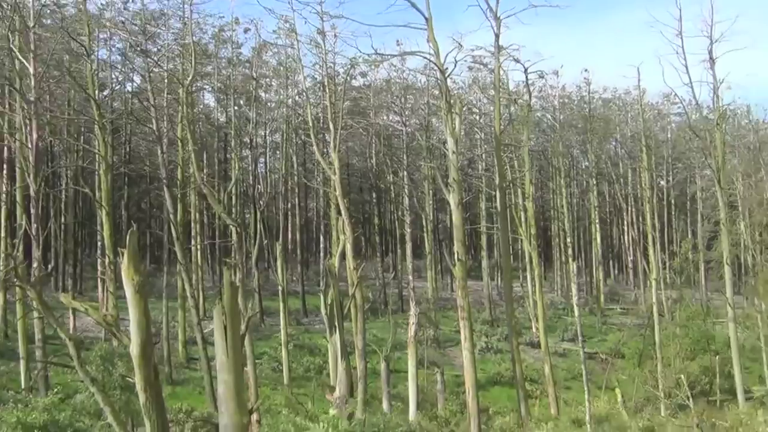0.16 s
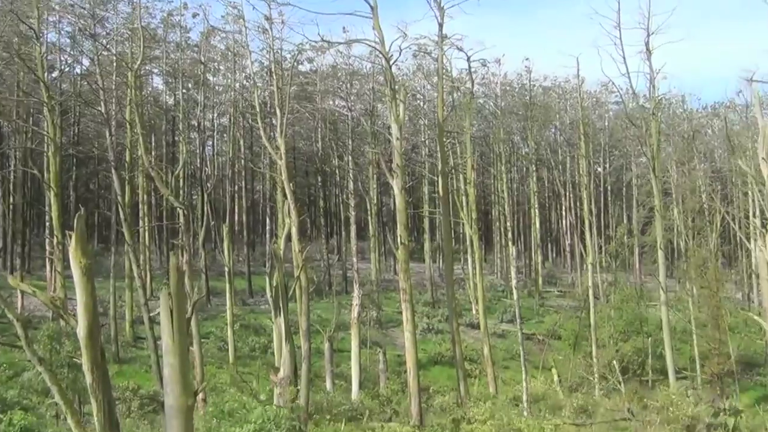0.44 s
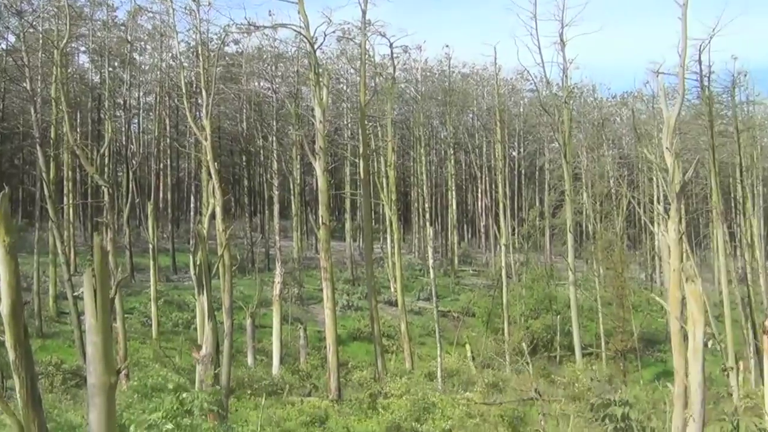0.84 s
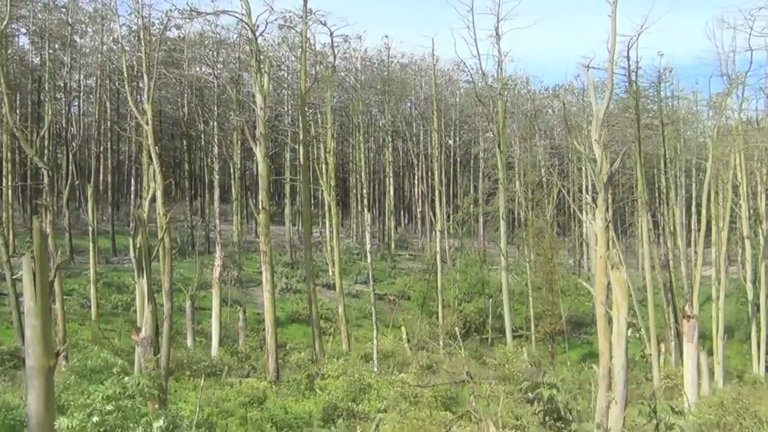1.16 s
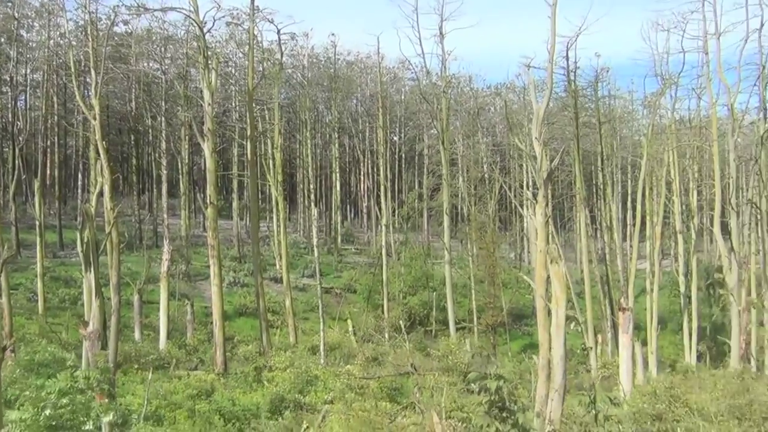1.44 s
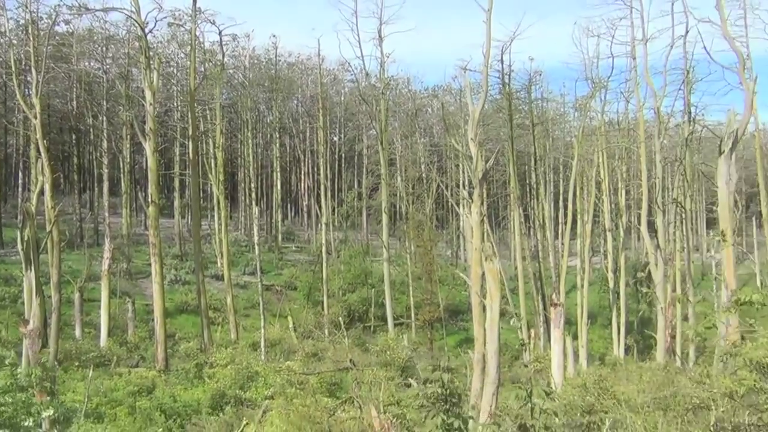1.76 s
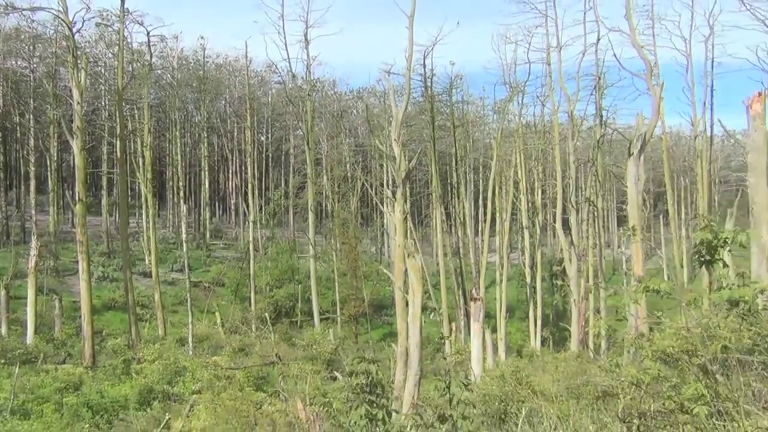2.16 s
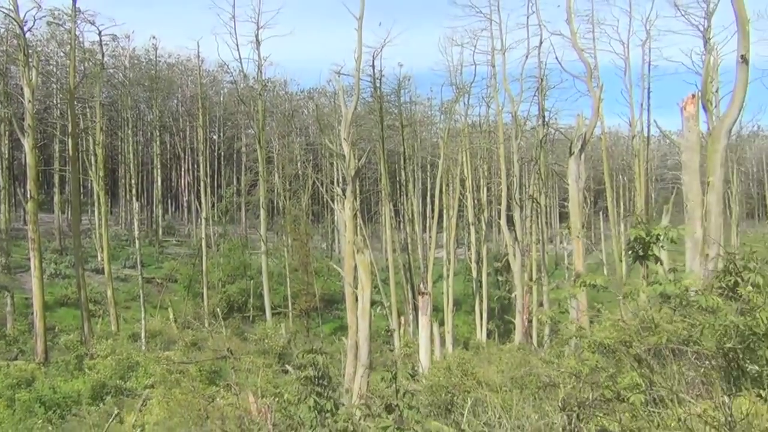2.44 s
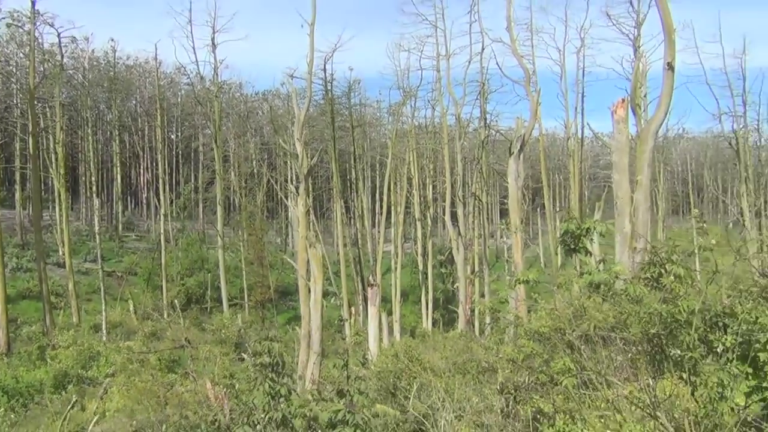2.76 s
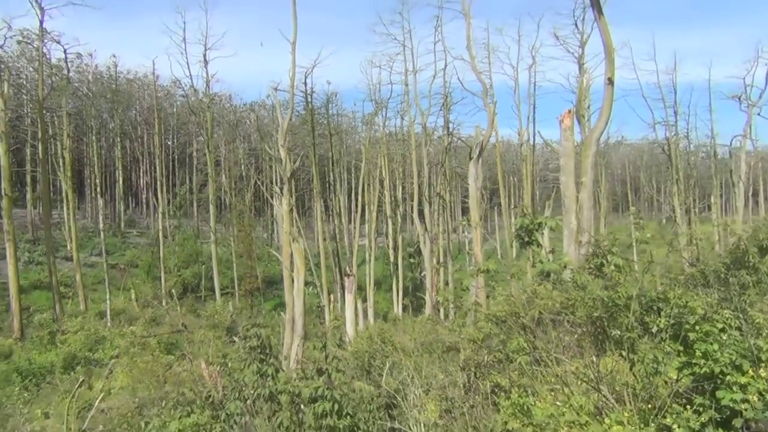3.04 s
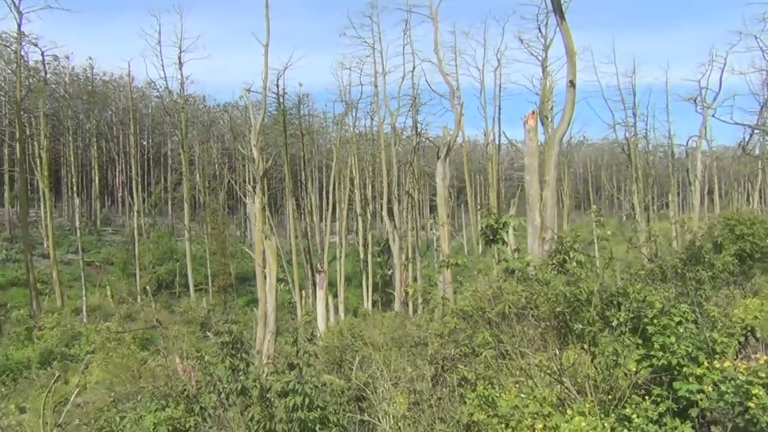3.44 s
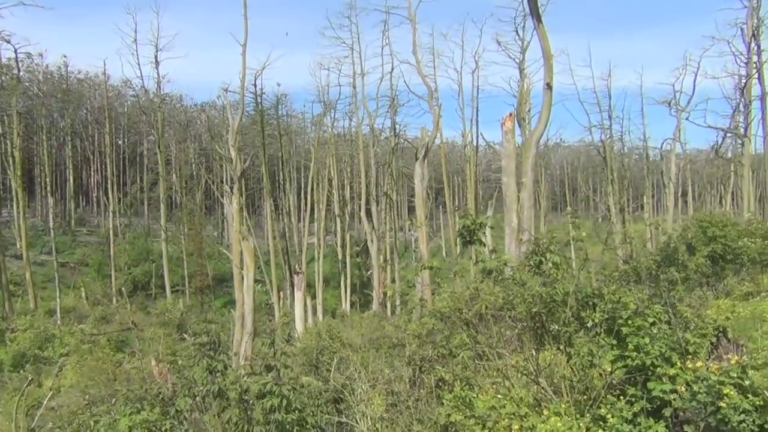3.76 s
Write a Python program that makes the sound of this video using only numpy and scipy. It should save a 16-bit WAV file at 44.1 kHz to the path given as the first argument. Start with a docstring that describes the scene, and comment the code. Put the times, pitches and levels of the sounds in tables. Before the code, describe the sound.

Steady overlapping whistled calls from a far bird colony, blurred by echo among trunks, with songbird chirps early, a thin long whistle near three seconds, then short trills; light low wind buffets on an outdoor stereo camera microphone.

```python
"""A distant bird colony in bare woodland: whistled calls blur into a wash around 2 kHz, a few nearer ones stand out.
The wash is shaped noise under a crowd of random gliding tones; the nearer calls are placed one by one.
Songbirds chirp, trill and hold one long whistle, all bending pure tones with an echo among the trunks.
Light wind puffs, as bursts of low noise, on the microphone of a slowly turning camera
that hisses (band-shaped noise) and whines faintly (a cluster of high sine tones)."""
import sys
import numpy as np
from scipy import signal
from scipy.fft import rfft, irfft, next_fast_len
from scipy.io import wavfile
from scipy.ndimage import uniform_filter1d, map_coordinates

SR = 44100
rng = np.random.default_rng(int(sys.argv[2]) if len(sys.argv) > 2 else 0)


def store_wav(level_fs):
    """Save 16-bit WAV to argv[1]."""
    pcm = np.round(np.clip(np.atleast_2d(level_fs), -1, 1) * 32767)
    wavfile.write(sys.argv[1], SR, pcm.T.astype(np.int16))


N = 171549

# Colour of the far colony and leaves: (frequency [Hz], relative density [dB per Hz])
WASH_SPECTRUM = [(180, -71), (300, -20.5), (498, -16.5), (850, -8.5), (1200, -3.5), (1370, -5.5),
                 (1940, -0.5), (2950, -9), (3770, -12), (4420, -19.5), (7870, -20.5), (9500, -34.5),
                 (12500, -44)]
# Loudness of the wash, also followed by the crowd: (time [s], level [dB])
WASH_LEVEL = [(0, -37), (.5, -39), (1.7, -38), (2.7, -39), (3.4, -38.5), (3.89, -38.5)]
# Swell of the wash's treble, used relative to its own mean: (time [s], level [dB])
TREBLE_SWELL = [(0, -49), (.045, -53.5), (.06, -46.5), (.085, -55), (.4, -60), (1.97, -62), (3.89, -63.5)]
# Stereo width of the wash: (frequency [Hz], left-right likeness [0-1])
WASH_ALIKE = [(300, 0.97), (640, 0.91), (1410, 0.99), (3100, 1), (5000, 0.9), (7500, 0.65), (10000, 1)]
# Stereo lean of the wash: (frequency [Hz], left over right [dB])
WASH_LEAN = [(200, -5), (700, -3.5), (1290, 0.5), (2380, 3), (4400, 0.4), (8120, 1.5)]
# Nearer colony whistles, level before flutter and echo:
# (time [s], length [s], first pitch [Hz], middle pitch [Hz], last pitch [Hz], level [dB])
WHISTLES = [(.28, .28, 1690, 1710, 1730, -45), (.53, .08, 1480, 1490, 1490, -43),
            (.52, .14, 2050, 2080, 2160, -46), (.16, .08, 1150, 1165, 1170, -47),
            (.86, .1, 2370, 2400, 2420, -48), (.62, .2, 1710, 1760, 1800, -48),
            (1.14, .14, 1680, 1675, 1690, -42), (1.28, .16, 1700, 1725, 1790, -43),
            (1.48, .1, 1790, 1760, 1730, -43), (1.7, .08, 2000, 2015, 2000, -45),
            (1.87, .25, 1740, 1765, 1765, -44.5), (2.12, .2, 1770, 1930, 2150, -47),
            (2.7, .19, 1860, 1900, 1990, -45), (2.94, .09, 1570, 1540, 1510, -43),
            (3.04, .09, 1860, 1875, 1885, -45), (3.41, .31, 2010, 1880, 1890, -43),
            (3.705, .065, 2110, 2160, 2220, -43), (3.785, .075, 2440, 2500, 2680, -45),
            (3.71, .08, 2440, 2460, 2470, -46), (3.0, .15, 3100, 3110, 3120, -51)]
# Songbird notes, level before flutter and echo:
# (time [s], length [s], first pitch [Hz], middle pitch [Hz], last pitch [Hz], level [dB])
CHIRPS = [(.338, 0.055, 4050, 4050, 4010, -53.5), (.408, 0.063, 7760, 6350, 4930, -48),
          (.585, 0.045, 7300, 6700, 5300, -45), (.622, .022, 5300, 5150, 5800, -47),
          (.596, .012, 4650, 4500, 4500, -49), (.635, 0.029, 3400, 3950, 4600, -47),
          (.798, 0.051, 7770, 6720, 5200, -44.5), (.85, 0.02, 5540, 5480, 5770, -47),
          (.795, 0.041, 5130, 4660, 3930, -51), (.852, 0.03, 3600, 3800, 4260, -45),
          (.872, .012, 4100, 3800, 3300, -54), (1.125, 0.056, 7600, 6540, 5130, -50.5),
          (1.122, .047, 5100, 4560, 3700, -54), (1.175, 0.03, 3500, 4070, 4000, -46),
          (1.315, 0.057, 7600, 7000, 5500, -52), (1.362, 0.02, 5400, 5320, 5330, -48),
          (1.305, 0.057, 5060, 4800, 3980, -55), (1.365, 0.029, 3650, 3850, 4540, -45.5),
          (1.392, 0.043, 4320, 3760, 3480, -45), (1.495, 0.02, 3900, 3850, 4030, -49),
          (1.53, 0.0236, 5600, 4670, 4450, -46.5), (1.647, 0.056, 5170, 4980, 4280, -49),
          (1.688, .031, 6470, 5650, 5000, -49), (1.727, .016, 5030, 5250, 5650, -47),
          (1.695, 0.059, 3980, 3710, 3420, -41), (1.746, 0.012, 4100, 4150, 4220, -37),
          (1.819, .038, 3790, 3200, 2800, -44.5), (1.854, 0.056, 4480, 4780, 3900, -50),
          (1.887, 0.041, 6650, 6000, 5000, -49), (1.921, .016, 5100, 5200, 5420, -49),
          (1.9, 0.024, 2550, 2760, 2980, -44), (1.926, 0.033, 3440, 3700, 4650, -45),
          (1.968, 0.024, 3400, 3480, 3560, -48), (2.1, 0.093, 8000, 7800, 8200, -56.5),
          (3.392, 0.035, 2800, 3010, 3250, -47), (3.533, 0.043, 3100, 2940, 3420, -42.5),
          (3.685, 0.05, 3340, 3010, 3440, -43), (3.682, .01, 3950, 3780, 3550, -44),
          (3.822, .012, 3970, 3750, 3450, -37), (3.835, 0.039, 3140, 3080, 3500, -42)]
# Trills of quick flicks, level before rounding, flutter and echo:
# (time [s], length [s], flick rate [1/s], centre pitch [Hz], upward sweep [Hz], level [dB])
TRILLS = [(1.604, .1, 62, 4100, 1000, -45), (3.348, .025, 93, 4000, 700, -46),
          (3.482, .066, 93, 3800, -500, -45), (3.638, .05, 90, 4020, -550, -43),
          (3.774, .05, 92, 4030, 450, -41.5)]
# First singer at the two ports: (frequency [Hz], left over right [dB], left leads by [rad])
OFF_AXIS = [(4300, -1, 0.094), (5200, 1, 1.07), (7500, 6.5, 1.6)]
# One long whistle, level before flutter and echoes: (time [s], pitch [Hz], level [dB])
LONG_WHISTLE = [(3.105, 4640, -70), (3.135, 4500, -58), (3.16, 4450, -44.5), (3.192, 4454, -41.5),
                (3.226, 4350, -43.5), (3.252, 4470, -45), (3.265, 4360, -68)]
# Wind puffs: (time [s], peak of the gain envelope [dB], bright over deep [dB])
PUFFS = [(0.015, -39, 5), (0.036, -40, -2), (.062, -43, -6), (0.13, -44, 10), (.151, -40, 10),
         (0.186, -44, 0), (.281, -44.5, 15), (0.361, -43, -14), (.39, -46, -4), (0.43, -39, 5),
         (.652, -43, 3), (.689, -40, -3), (0.749, -42.5, 26), (0.779, -46, 13), (.872, -52, 0),
         (1.232, -40.5, -6.5), (1.327, -49.5, -16), (1.507, -46, -3), (1.592, -54, -8), (1.708, -53, -11),
         (1.756, -43, -3), (1.809, -56, -4), (1.965, -48.5, 5), (2.085, -53, 6), (2.172, -39, 1),
         (2.198, -31.5, 2), (2.217, -32.5, 15), (2.305, -39.5, 7), (2.343, -44.5, 4), (2.54, -55.5, -8),
         (2.8, -52, 4), (3.075, -52, -13), (3.108, -39.5, -9), (3.359, -45, -8), (3.386, -49, -5),
         (3.865, -50, -13)]
# Stereo width of the wind: (frequency [Hz], left-right likeness [0-1])
WIND_ALIKE = [(25, .1), (60, .55), (130, 0.9), (300, .96)]
# Colours of the deep and the bright wind: (frequency [Hz], relative density [dB per Hz])
DEEP = [(25, -45), (60, -23), (110, -7.5), (200, 2), (300, -2), (500, -12), (1000, -70)]
BRIGHT = [(60, -30), (200, -8), (300, -4.5), (450, -1.5), (700, -6.5), (1200, -7.5), (2500, -46)]
# Breeze under the puffs, before its random lumps: (time [s], gain [dB])
BREEZE = [(0, -49), (.45, -51.5), (.55, -56.5), (.7, -54), (.95, -64.5), (2.5, -63), (3.3, -66.5),
          (3.89, -61.5)]
# Rumble, nearly unrelated in the two ports: (frequency [Hz], relative density [dB per Hz])
RUMBLE = [(15, -20), (30, -16), (60, -1), (110, 7), (200, -9), (400, -60)]
# Colour of the recorder's hiss: (frequency [Hz], relative density [dB per Hz])
HISS = [(5290, -21), (9000, -1), (11000, -2), (15100, -4), (15800, -4)]
# Tones of the electrical whine: (frequency [Hz], level [dB])
WHINE = [(15574, -86), (15628, -83), (15676, -87)]

TREBLE_HZ = 4900  # where the wash's treble begins
CROWD_DB, CROWD_HZ, CROWD_S = -7.5, 1943.5, 0.1101  # level over the wash, median pitch, median length
CROWD_SPREAD, CROWD_SCATTER_DB = .18, 3.5  # random spread of log pitch and of level
CROWD_RISE, CROWD_GLIDE = .025, .025  # common and random pitch bend, shares of the pitch
EDGE, WAVER = .22, .004  # share of a note that fades at each end; unsteadiness as a share of pitch
FLUTTER_DB = 2.4  # random flutter of note level
FLICK = .95  # length of a flick over its period
WHISTLE_LEAN_DB, FAR_SINGER_LEAN_DB = 4, 4  # left over right
CHANGE_S = 2.6  # a second singer takes over
WOOD_S = 0.53  # echo among trunks: time to fall 60 dB
CROWD_WET_DB, NEAR_WET_DB, SONG_WET_DB = -4.5, -8, -7  # that echo, for crowd, nearer whistles and songbirds
SLAP_S, SLAP_DB, SLAP_STEP_DB = .122, -14, 0.5  # wood's-edge echo: delay, level, rise on the second return
PUFF_S = 0.0062  # Gaussian half width (sigma)
BREEZE_LUMPS_DB, BREEZE_BRIGHT_DB = 3.5, -4  # random lumps; bright part against deep part
RUMBLE_DB, WIND_LEAN_DB = -70, -1.7  # rumble level; wind's left over right
HISS_DB = -63.5
WHINE_DRIFT = 1.8  # scale of the slow phase wander, radians
TURN_DB_PER_S = 0.18  # the scene drifts left as the camera turns
TOP_HZ = 15790  # the camera's band limit


def colony():
    """The whole colony: far wash, overlapping crowd and nearer whistles echoing among the trunks."""
    level = amp(curve(WASH_LEVEL))
    near = wood(sung(WHISTLES), WHISTLE_LEAN_DB, NEAR_WET_DB)
    return far_wash(level) + crowd(level) + near


def far_wash(level):
    """Voices and leaves too far to tell apart: shaped noise whose treble swells on its own."""
    wash = rush([(100, -120)] + WASH_SPECTRUM, WASH_ALIKE, patchy_db=1.43)
    treble = filtered(wash, lambda hz: 1 / (1 + (TREBLE_HZ / (hz + 1)) ** 8))
    body = wash - treble
    swell = curve(TREBLE_SWELL)
    treble_gain = level.mean() * amp(swell - swell.mean())
    return filtered(level * body + treble_gain * treble, lambda hz: sides(along(WASH_LEAN, hz)))


def crowd(level, count=360):
    """Random whistles, scattered in pitch, length, bend and level, overlapping in the echoing wood."""
    when = rng.uniform(0, N / SR, count)
    pitch, length, bend, arch, loudness = rng.standard_normal((count, 5)).T
    hz = CROWD_HZ * np.exp(CROWD_SPREAD * pitch)
    rise = CROWD_RISE + CROWD_GLIDE * bend
    middle = hz * (1 + CROWD_GLIDE * arch / 2)
    calls = zip(when, CROWD_S * np.exp(length / 4), hz * (1 - rise), middle, hz * (1 + rise),
                CROWD_SCATTER_DB * loudness)
    return level * amp(CROWD_DB) * unit(wood(sung(calls), WHISTLE_LEAN_DB, CROWD_WET_DB))


def songbirds():
    """Two singers in turn; the first reaches the ports off axis, with level and phase differences."""
    notes = sung(CHIRPS + flicks())
    late = np.arange(N) > CHANGE_S * SR
    f, lean_db, lead = np.transpose(OFF_AXIS)

    def ports(hz):
        phase = .5j * np.outer([1, -1], np.interp(hz, f, lead))
        return sides(np.interp(hz, f, lean_db)) * np.exp(phase)

    first = filtered(wood(notes * ~late, 0, SONG_WET_DB), ports)
    second = wood(notes * late + long_whistle(), FAR_SINGER_LEAN_DB, SONG_WET_DB)
    return first + second


def flicks():
    """Each trill as a row of short gliding notes, loudest in the middle of the row."""
    notes = []
    for s, length, rate, hz, sweep, db in TRILLS:
        for k in range(int(length * rate)):
            arch = np.sin(np.pi * (k + 1) / (length * rate + 1))
            notes.append((s + k / rate, FLICK / rate, hz - sweep / 2, hz, hz + sweep / 2,
                          db + 4 * np.log(arch + 0.0011)))
    return notes


def long_whistle():
    """A held, dipping sine whistle that comes back twice off the wood's edge."""
    s, hz, db = np.transpose(LONG_WHISTLE)
    t = np.arange(N) / SR
    phase = 2 * np.pi * np.cumsum(np.interp(t, s, hz)) / SR
    tone = amp(np.interp(t, s, db, -120, -120)) * 2 ** .5 * np.sin(phase)
    back = sum(amp(SLAP_DB + SLAP_STEP_DB * k) * np.roll(tone, round(SLAP_S * (k + 1) * SR))
               for k in range(2))
    return (tone + back) * amp(FLUTTER_DB / 2 * wobble(60))


def sung(notes):
    """Pure notes whose pitch bends through three values, with unsteady level and pitch."""
    out = np.zeros(N + 2 * SR)
    flutter = amp(FLUTTER_DB * wobble(130))
    waver = 1 + WAVER * wobble(80)
    for s, length, first, mid, last, db in notes:
        i = round(s * SR)
        u = np.linspace(0, 1, max(round(length * SR), 2))
        # parabola through the first, middle and last pitch
        hz = first * (1 - u) * (1 - 2 * u) + 4 * mid * u * (1 - u) + last * u * (2 * u - 1)
        hz = hz * np.resize(waver[i:], len(u))
        tone = np.sin(2 * np.pi * np.cumsum(hz) / SR)
        out[i:i + len(u)] += amp(db) * 2 ** .5 * fade(u) * tone
    return out[:N] * flutter


def fade(u):
    """Soft rise, hold and fall over u from 0 to 1."""
    return np.sin(np.pi / 2 * np.clip(np.minimum(u, 1 - u) / EDGE, 0, 1)) ** 2


def wood(x, lean_db, wet_db):
    """The direct sound and its scattered echo among trunks: decaying noise, partly shared by both sides."""
    t = np.arange(SR // 2) / SR
    noise = rng.standard_normal((3, len(t))) * amp(-60 * t / WOOD_S)
    shared = noise[0]
    tail = (shared + 0.39 * noise[1:]) / np.linalg.norm(shared)
    echo = signal.fftconvolve(x[None], tail, axes=1)[:, :N]
    return sides(lean_db)[:, None] * (x + amp(wet_db) * echo)


def wind():
    """Turbulence on the microphone: lumpy low breeze, short deep or bright puffs, and a rumble."""
    t = np.arange(N) / SR
    s, db, bright_db = np.transpose(PUFFS)
    shape = np.exp(-((t - s[:, None]) / PUFF_S) ** 2 / 2)
    deep_share = 1 / (1 + amp(2 * bright_db))  # shares of each puff's power
    bright_share = 1 / (1 + amp(-2 * bright_db))
    breeze = amp(curve(BREEZE) + BREEZE_LUMPS_DB * wobble(17))
    deep_gain = (amp(db) * np.sqrt(deep_share)) @ shape + breeze
    bright_gain = (amp(db) * np.sqrt(bright_share)) @ shape + amp(BREEZE_BRIGHT_DB) * breeze
    deep = deep_gain * even(rush(DEEP, WIND_ALIKE, patchy_db=-1.5))
    bright = bright_gain * even(rush(BRIGHT, WIND_ALIKE, patchy_db=1.0))
    rumble = amp(RUMBLE_DB) * rush(RUMBLE, [(50, -0.16)], patchy_db=-2.5)
    return sides(WIND_LEAN_DB)[:, None] * (deep + bright) + rumble


def hiss():
    """The recorder's own steady high noise, nearly the same on both sides."""
    return amp(HISS_DB) * rush([(5000, -40)] + HISS, [(9000, .97), (13000, .989)], patchy_db=.6)


def whine():
    """A faint electrical tone with side tones, all sharing one slow phase wander."""
    t = np.arange(N) / SR
    drift = WHINE_DRIFT * wobble(8)
    return sum(amp(db) * 2 ** .5 * np.sin(2 * np.pi * hz * t + drift) for hz, db in WHINE)


def rush(spectrum, alike, patchy_db):
    """Stereo noise of rms 1 with patches of random gain in time and frequency."""
    z = signal.stft(rng.standard_normal((2, N)), nperseg=512)[2]
    field = uniform_filter1d(rng.standard_normal(z.shape[1:]), size=4, axis=0)  # across frequency
    field = uniform_filter1d(field, size=12, axis=1)  # across time
    pair = signal.istft(z * amp(patchy_db * unit(field)), nperseg=512)[1][:, :N]

    def mid_side(hz):
        # this split of mid and side gives the wanted left-right likeness
        angle = np.arccos(np.clip(along(alike, hz), -1, 1)) / 2
        return amp(along(spectrum, hz)) * np.array([np.cos(angle), np.sin(angle)])

    mid, side = filtered(pair, mid_side)
    return unit(np.array([mid + side, mid - side]))


def even(x):
    """x with its short-term level partly evened out."""
    power = np.abs(uniform_filter1d(np.mean(x ** 2, 0), size=700))
    return x / np.sqrt(power + .08)


def amp(db):
    """Decibels to a gain factor."""
    return 10 ** (np.asarray(db) / 20)


def unit(x):
    """x scaled to rms 1."""
    return x / np.sqrt(np.mean(x ** 2) + 1e-20)


def along(points, hz):
    """Values between (frequency [Hz], value) points on a log axis."""
    f, v = np.transpose(points)
    return np.interp(np.log(hz + 1), np.log(f + 1), v)


def curve(rows):
    """(time [s], value) points drawn out to one value per sample."""
    return np.interp(np.arange(N) / SR, *np.transpose(rows))


def wobble(rate):
    """A smooth random curve, rate knots a second."""
    knots = rng.standard_normal(int(N * rate / SR) + 4)
    return map_coordinates(knots, [np.arange(N) * rate / SR])


def filtered(x, response):
    """x times a response of frequency."""
    m = next_fast_len(N + SR // 2)
    return irfft(rfft(x, m) * response(np.fft.rfftfreq(m, 1 / SR)), m)[..., :N]


def sides(db):
    """Left and right gains for a lean of left over right in dB."""
    return np.array([amp(db / 2), amp(-db / 2)])


def scene():
    """Birds drifting left as the camera turns, over wind, hiss and whine that stay in place."""
    birds = colony() + songbirds()
    turn = sides(TURN_DB_PER_S * (np.arange(N) - N / 2) / SR)
    return birds * turn + wind() + whine() + hiss()


def record(dry):
    """The camera keeps nothing above its band limit."""
    return filtered(dry, lambda hz: hz < TOP_HZ)


dry = scene()
out = record(dry)
store_wav(out)
```